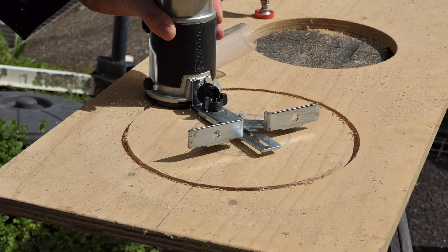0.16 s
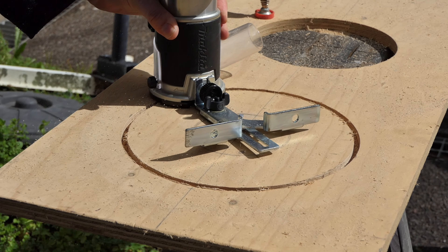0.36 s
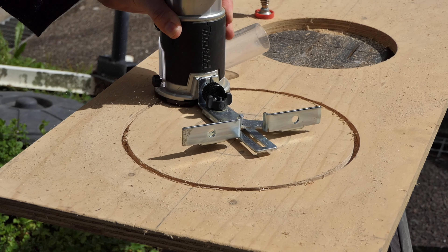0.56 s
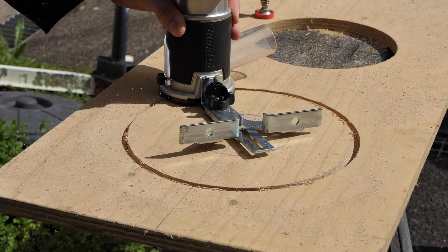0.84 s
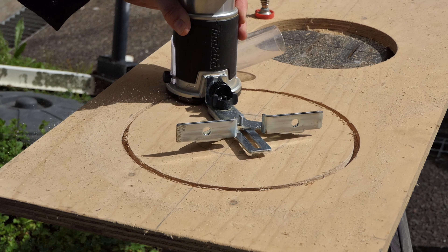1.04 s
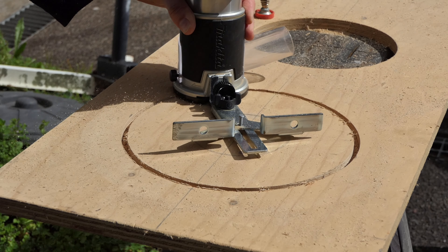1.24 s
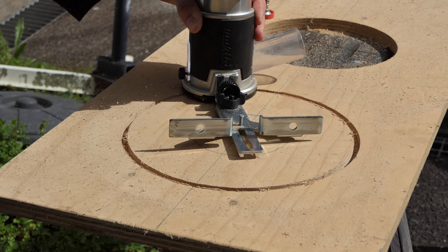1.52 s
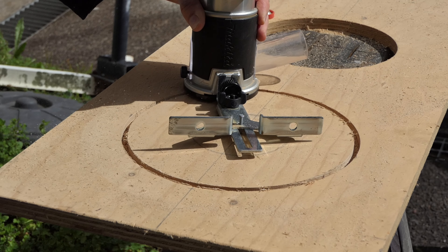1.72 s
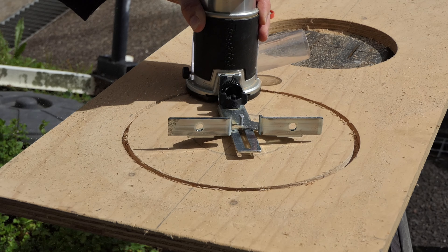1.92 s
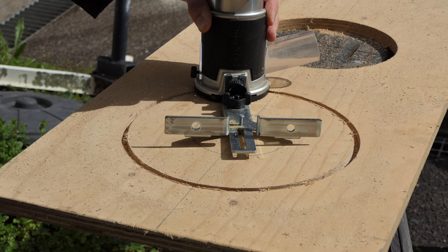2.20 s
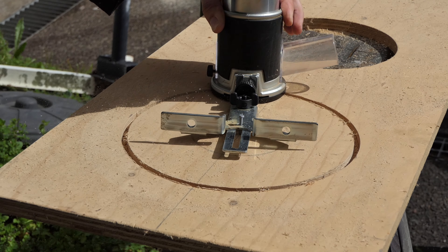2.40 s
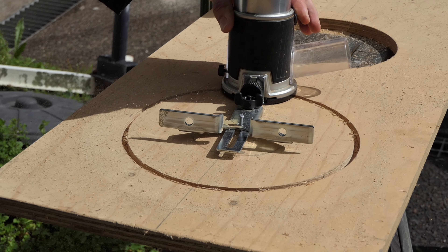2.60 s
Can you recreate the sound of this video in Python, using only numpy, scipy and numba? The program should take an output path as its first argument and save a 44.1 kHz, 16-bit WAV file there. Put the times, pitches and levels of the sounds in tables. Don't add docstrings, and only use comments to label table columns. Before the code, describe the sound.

Loud electric router cutting wood about a metre away in open air; its nearly constant pitch dips slightly near the end, while bright overtones come and go over hissing chips and air, with no start-up or stop.

```python
import sys
import numpy as np
from scipy import signal
from scipy.io import wavfile
from scipy.ndimage import uniform_filter1d
from numba import njit

SR = 44100
rng = np.random.default_rng(int(sys.argv[2]) if len(sys.argv) > 2 else 0)


def dump(signal):
    limited = np.clip(np.atleast_2d(signal).T, -1, 1)
    pcm = np.round(limited * 32767).astype(np.int16)
    wavfile.write(sys.argv[1], SR, pcm)


def undo_db(level):
    steps = np.asarray(level, float) / 20
    return 10 ** steps


N = 121716


def curve(table, col, t):
    rows = np.array(table, float)
    return np.interp(t, rows[:, 0], rows[:, col])


def on_log(table, hz):
    rows = np.array(table, float)
    return np.interp(np.log(hz), np.log(rows[:, 0]), rows[:, 1])


def unit(x):
    return x / np.sqrt(np.mean(x ** 2))


def walk(rate_hz):
    k = int(SR / rate_hz)
    steps = np.repeat(rng.standard_normal(N // k + 1), k)
    return 1.115 * uniform_filter1d(uniform_filter1d(steps, k), k)[:N]


def hold(t, start_s, length_s, edge_s):
    inside = np.minimum(t - start_s, start_s + length_s - t)
    return np.clip(inside / max(edge_s, .001) + .5, 0, 1)


@njit
def svf(x, hz, width_hz):
    y, band, low = np.empty(len(x)), 0., 0.
    g, k = np.tan(np.pi * hz / SR), width_hz / hz
    for i in range(len(x)):
        v = (band + g * (x[i] - low)) / (1 + g * (g + k))
        band, low, y[i] = 2 * v - band, low + 2 * g * v, k * v
    return y


def noise_band(gate, hz, width_hz):
    noise = rng.standard_normal(N) * gate
    return svf(svf(noise, float(hz), float(width_hz)), float(hz), float(width_hz))


# (frequency [Hz], side minus mid [dB])
WIDTH = [(60, -7), (200, -7.5), (430, -21), (700, -15), (1300, -20.5), (2400, -16), (4400, -18.5),
         (8000, -18), (11000, -15.5), (14000, -8.5)]


def side_db(hz):
    return on_log(WIDTH, hz)


# (time [s], rate [turns/s])
SHAFT = [(0.05, 471.2), (0.28, 470.1), (0.96, 471.3), (1.23, 469.9), (1.51, 469.8), (1.86, 472.3),
         (1.98, 470.2), (2.18, 472.8), (2.37, 469.5), (2.46, 471.2), (2.56, 464.7), (2.72, 468.3),
         (2.76, 466.1)]


def shaft_turns(t):
    wobble = 0.0005
    return np.cumsum(curve(SHAFT, 1, t) * (1 + wobble * walk(39.45))) / SR


# (shaft multiple,
# start [s], length [s], gain [dB])
CATCHES = [(2, 0, 0.5, -12), (2, 0.5, 0.24, -6), (2, 1.97, 0.17, 4), (2, 2.55, 0.19, -8),
           (3, 0.33, 0.13, -4), (4, 2.11, 0.07, -9), (6, 0.31, 0.08, -7), (6, 0.45, 0.31, 4),
           (6, 0.78, 0.19, -7), (6, 1.32, 0.21, 6), (6, 2.1, 0.19, 4), (6, 2.35, 0.06, -6),
           (7, 1.17, 0.29, -2), (7, 2.0, 0.08, -5), (7, 2.42, 0.06, 4), (8, 0.94, 0.38, 2),
           (8, 2.55, 0.25, -8), (9, 0.77, 0.17, -6), (9, 1.88, 0.15, 11), (9, 2.41, 0.13, 5),
           (10, 0.21, 0.16, -7), (10, 0.77, 0.09, -6), (10, 0.98, 0.39, -4), (10, 1.27, 0.33, -10),
           (10, 1.6, 0.12, -5), (10, 2.57, 0.23, -6),
           (11, 0.4, 0.33, 3), (11, 0.77, 0.52, -3), (11, 1.58, 0.19, -8), (11, 2.12, 0.16, -7),
                (11, 2.44, 0.36, 7), (12, 0.81, 0.57, -5), (12, 1.57, 0.21, -8), (12, 2.45, 0.07, -13),
                (13, 0.94, 0.38, 5), (13, 1.94, 0.06, 7), (14, 0.66, 1.05, -5), (14, 2.19, 0.19, -8),
                (15, 0.81, 0.54, 6), (15, 1.03, 0.05, -8), (16, 0.58, 0.42, -8), (16, 1.38, 0.23, -10),
                (16, 1.87, 0.17, 7), (17, 0.41, 0.14, 6), (17, 2.41, 0.39, -7), (18, 0.11, 0.12, -6),
                (18, 0.87, 0.8, -5), (18, 2.39, 0.35, -7), (19, 0, 0.19, -8), (19, 0.66, 0.08, 4),
                (19, 1.57, 0.74, -5), (20, 0.31, 0.42, -5), (20, 1.26, 0.45, -7), (20, 2.49, 0.31, -5),
                (21, 0.08, 0.07, 6), (21, 1.45, 0.45, -5), (21, 2.56, 0.24, -8), (22, 0.74, 0.47, -6),
                (22, 1.57, 0.19, -7), (22, 2.34, 0.1, 10), (23, 0.77, 0.78, -4), (24, 0.09, 0.09, -8),
                (24, 1.55, 0.28, -5), (25, 0.83, 0.54, -6), (25, 2.28, 0.52, -7), (26, 0.47, 0.52, 4),
                (26, 0.83, 0.36, 5), (27, 2.28, 0.34, -7), (28, 0.25, 0.31, -8), (28, 1.16, 0.72, -6),
                (28, 2.31, 0.34, -10), (29, 0, 0.36, -9), (29, 1.16, 0.53, -5), (30, 0.8, 0.2, 8),
                (31, 1.88, 0.12, 11), (32, 0.68, 0.86, -8),
           (12, 1.79, .04, 4), (12, 1.94, .05, 5), (11, 1.79, .03, 5), (12, 2.56, .14, 4),
            (11, 2.44, .09, -3), (5, 2.39, .03, -4), (5, 2.43, .04, 2.5), (9, 1.88, .15, -2.5),
            (19, 2.42, .08, 4), (20, 2.42, .07, 3), (8, 2.05, .3, 2.5), (1, 1.58, .08, -6)]


def catch_db(order, t):
    edge_s = .028
    events = CATCHES
    return sum(gain_db * hold(t, start_s, length_s, edge_s)
               for n, start_s, length_s, gain_db in events if round(n) == order)


# (time [s], shaft [Hz], base plate [dB], board [dB], bit [dB], motor case [dB])
RING = [(0.05, 472.3, -35, -26.5, -30.5, -37), (0.12, 470.3, -27.5, -40, -19.5, -39),
        (0.21, 469.8, -32.5, -29, -23.5, -33.5), (0.7, 470.6, -30.5, -26.5, -25.5, -33),
        (0.79, 470.0, -28.5, -29.5, -33, -31), (0.86, 470.2, -31, -41.5, -23, -35),
        (0.98, 471.6, -25.5, -39, -24.5, -29.5), (1.04, 469.9, -25.5, -27, -33, -31),
        (1.06, 471.2, -36, -29, -25.5, -32.5), (1.16, 470.6, -26, -30, -24, -28),
        (1.46, 470.0, -31.5, -21, -29.5, -39), (1.54, 469.3, -41, -24, -34, -36),
        (1.77, 472.5, -43, -34.5, -33, -26), (1.89, 470.9, -35.5, -28.5, -28, -31),
        (2.25, 471.9, -37, -19.5, -34.5, -29), (2.32, 471.5, -39.5, -21, -25.5, -39),
        (2.59, 464.8, -23.5, -22, -31.5, -37), (2.76, 468.2, -21.5, -20, -30, -35.5)]
RING_ORDERS = (4, 5, 7, 3)
# (shaft multiple, level [dB])
EARLY = [(1, -13), (2, -5), (3, -4), (4, -4), (5, -4), (6, -13), (7, -4), (8, -8), (9, -11), (10, -11),
         (11, -8), (12, -11), (13, -16), (14, -19), (15, -18), (16, -20), (17, -23), (18, -12), (19, -9),
         (20, -16), (21, -21), (22, -15), (23, -19), (24, -16), (25, -22), (26, -23), (27, -25), (28, -26),
         (29, -20), (30, -28), (31, -29), (32, -35)]
LATE = [-24, -11, -6, -6, -6, -11, -6, -5, -18, -14, -14, -13, -22, -22, -16, -23, -19, -15, -16, -15, -20,
        -23, -24, -25, -22, -28, -29, -28, -31, -37, -38, -38]


def whine(t, turns):
    early_s, late_s, early_gain_db, late_gain_db = 0.54, 2, -25.5, -24
    fade_db, fade_hz, flutter_db = .5, 12, 1.4
    spread_cycles, lean_rad = .62, .2
    jitter_rad, snag_jitter = .015, 0.51
    duck = 1
    plate_side_db, line_side_db = -36, 0.5
    mid, side, torn_db = 0, 0, snag_db(t)
    travel = np.clip((t - early_s) / (late_s - early_s), -.2, 1.2)
    for (k, early_db), late_db in zip(EARLY, LATE):
        start, lean = rng.random(), walk(1.73)
        if k in RING_ORDERS:
            db = curve(RING, 2 + RING_ORDERS.index(k), t)
        else:
            db = (1 - travel) * (early_db + early_gain_db) + travel * (late_db + late_gain_db)
            db = db + fade_db * (1 + k / 30) * walk(fade_hz) - duck * torn_db
        db = db + catch_db(k, t)
        size = np.sqrt(2) * undo_db(db + flutter_db * walk(60))
        phase = 2 * np.pi * (k * turns + spread_cycles * start) + lean_rad + .3 * lean
        phase = phase + jitter_rad * k * walk(90) * (1 + snag_jitter * torn_db)
        mid = mid + size * np.cos(phase)
        if k == RING_ORDERS[0]:
            plate = np.sqrt(2) * undo_db(plate_side_db + 0.64 * (db - db.mean()))
            side = side - plate * np.cos(phase + 0.44 * lean)
        else:
            side_size = size * undo_db(side_db(k * SHAFT[0][1]) + line_side_db)
            side = side + side_size * np.cos(phase + np.pi / 2 + .5 * lean)
    return mid, side


def puffs(turns):
    depth, decay_turns = .55, 0.18
    return 1 - depth * (1 - np.exp(-(turns % 1) / decay_turns))


# (time [s], chip load [dB], grit against the guard [dB])
LOAD = [(0.05, -28.5, -43.5), (0.1, -28, -44), (0.19, -33, -44.5), (0.32, -31.5, -45), (0.62, -33, -46),
        (0.85, -31.5, -45.5), (1.2, -33, -45.5), (1.44, -30, -45.5), (1.47, -33.5, -49), (1.76, -29.5, -47),
        (2.06, -31.5, -45), (2.08, -28, -44.5), (2.23, -35, -47.5), (2.27, -26.5, -48), (2.29, -33, -48),
        (2.76, -38, -50)]


def cutting_load(t):
    snag_hiss = .5
    load, grit = curve(LOAD, 1, t), curve(LOAD, 2, t)
    return load - load.mean(), grit - grit.mean() + snag_hiss * snag_db(t)


def rush_gains(db, hz):
    noise_side_db = -1.5
    return undo_db(db) * undo_db([[0], [side_db(hz) + noise_side_db]])


LOW_SINK_DB_PER_S = 1.2

# (frequency [Hz], density [dB/Hz])
RUSH = [(40, -46), (130, -19), (330, -23), (570, -34), (690, -8.5), (2600, -9), (7000, -18), (14500, -20.5)]


def chip_rush(t, gate, load, grit):
    rush_db, load_share = -30.5, 0.54
    swell, wide = walk(8.09), 0
    for hz in 45 * 2 ** np.arange(0, 8.5, .4):
        band_gate = gate if hz > 900 else gate.mean()
        pair = np.array([noise_band(band_gate, hz, hz / 2.7) for _ in range(2)])
        db = on_log(RUSH, hz) + 0.76 * swell + 1.2 * walk(14)
        if hz > 2200:
            db = db + grit
        else:
            db = db + load_share * load
        if hz < 800:
            db = db - LOW_SINK_DB_PER_S * (t - 1.4)
        wide = wide + pair * rush_gains(db, hz)
    return wide / np.std(wide[0]) * undo_db(rush_db)


# (frequency [Hz], width [Hz], level [dB])
HOLLOWS = [(1623, 353, -33), (3170, 490, -43), (9800, 2700, -40.5), (417, 30, -58.5)]


def hollow_rush(t, gate, load, grit):
    rasp_db, rasp_hz = 2, 150
    hollow = 0
    for k, (hz, width_hz, level_db) in enumerate(HOLLOWS):
        pair = np.array([unit(noise_band(gate, hz, width_hz)) for _ in range(2)])
        if k == 0:
            drive_db = load + rasp_db * walk(rasp_hz)
        elif hz > 2200:
            drive_db = grit
        else:
            drive_db = -LOW_SINK_DB_PER_S * t
        db = level_db + drive_db + 0.46 * walk(12)
        hollow = hollow + pair * rush_gains(db, hz)
    return hollow


def wind():
    level_db, hz, width_hz = -82, 35, 30
    return undo_db(level_db) * np.array([unit(noise_band(1, hz, width_hz)) for _ in range(2)])


# (time [s], length [s], tearing [dB])
SNAGS = [
    (0.128, 0.047, 2),
    (0.447, 0.027, 3),
    (.79, .03, 2),
    (1.04, .04, 3),
    (1.36, 0.018, 5),
    (1.436, 0.026, 3),
    (2.38, .035, 4.5),
    (2.522, .03, 2),
]


def snag_db(t):
    return sum(db * hold(t, start_s, length_s, 0.0044) for start_s, length_s, db in SNAGS)


def board_hum(t):
    hz, width_hz, level_db, start_s, length_s = 169.7, 8.8, -58, 1.63, 0.61
    hum = unit(svf(rng.standard_normal(N), hz, width_hz))
    return hum * undo_db(level_db) * hold(t, start_s, length_s, .08)


def scene():
    t = np.arange(N) / SR
    turns = shaft_turns(t)
    gate = puffs(turns)
    load, grit = cutting_load(t)
    router = np.array(whine(t, turns)) + chip_rush(t, gate, load, grit)
    mid, side = router + hollow_rush(t, gate, load, grit)
    return np.array([mid + side, mid - side]) + wind() + board_hum(t)


def low_pass(x):
    return signal.sosfilt(signal.butter(12, 15830, fs=SR, output="sos"), x)


def record(dry):
    start_s, fade_in_s, mic_top_hz = 0.0429, 0.0045, 14800
    fade = np.clip((np.arange(N) / SR - start_s) / fade_in_s, 0, 1)
    soft = signal.sosfilt(signal.butter(8, mic_top_hz, fs=SR, output="sos"), dry)
    return low_pass(soft * fade)


dry = scene()
out = record(dry)
dump(out)
```